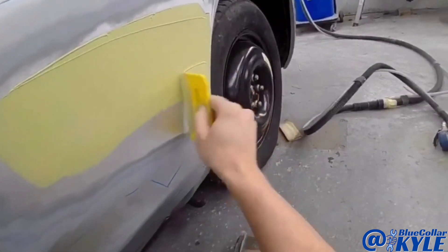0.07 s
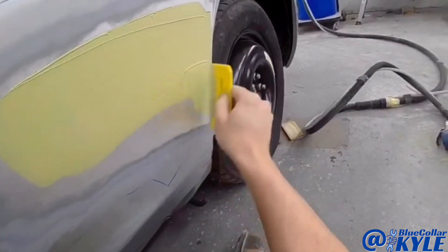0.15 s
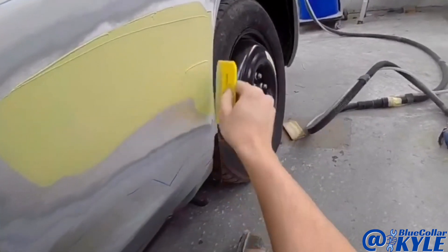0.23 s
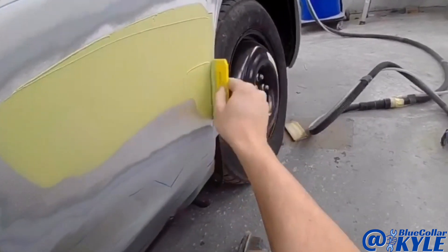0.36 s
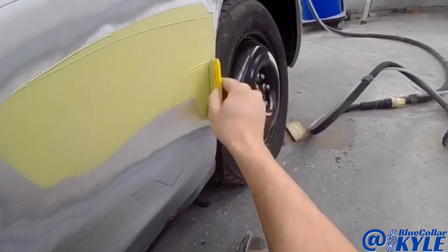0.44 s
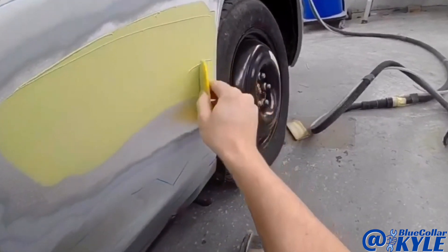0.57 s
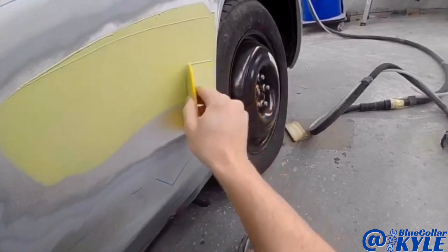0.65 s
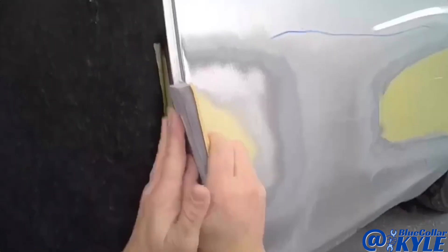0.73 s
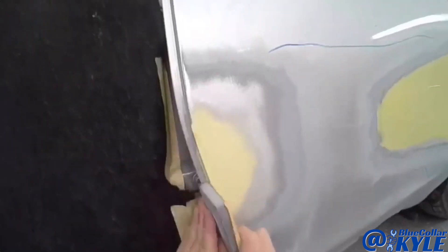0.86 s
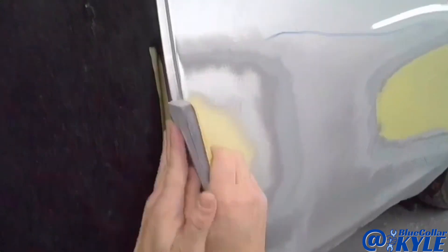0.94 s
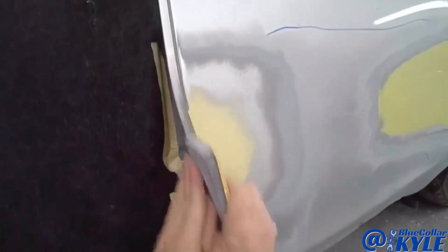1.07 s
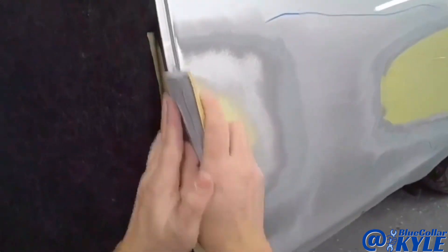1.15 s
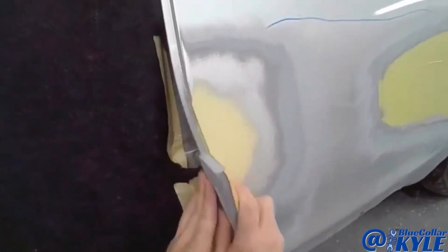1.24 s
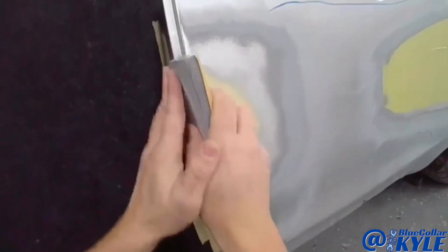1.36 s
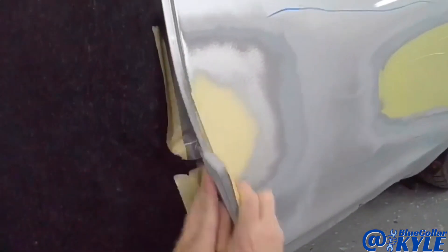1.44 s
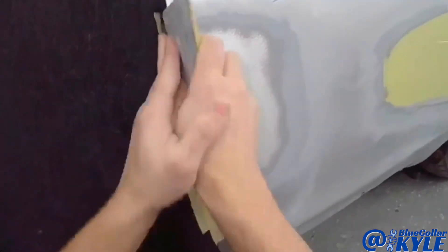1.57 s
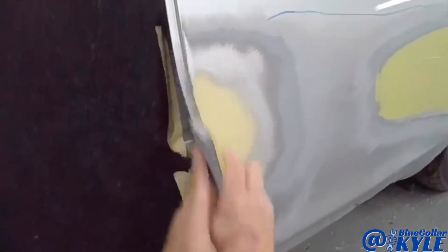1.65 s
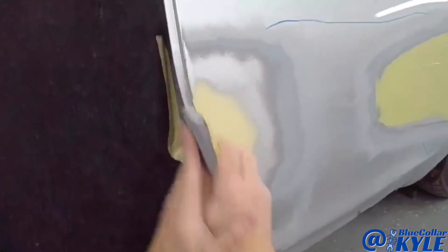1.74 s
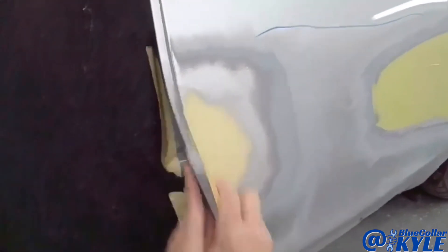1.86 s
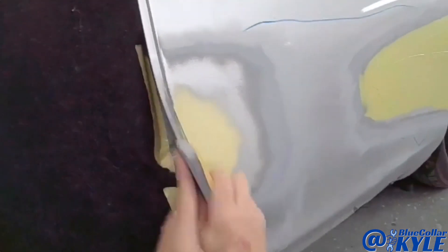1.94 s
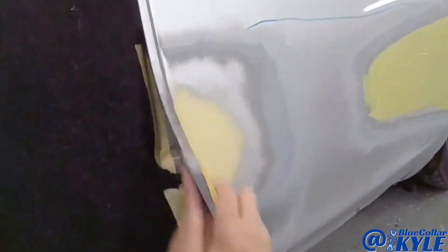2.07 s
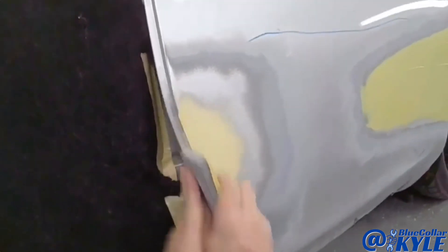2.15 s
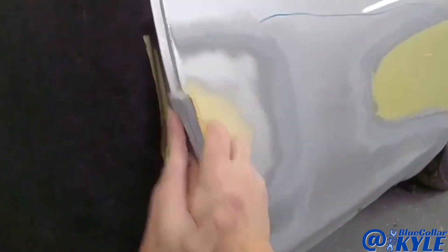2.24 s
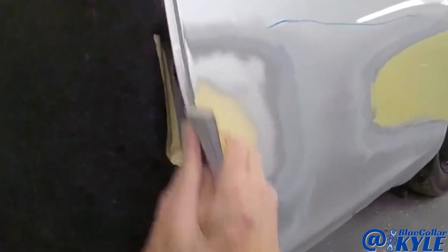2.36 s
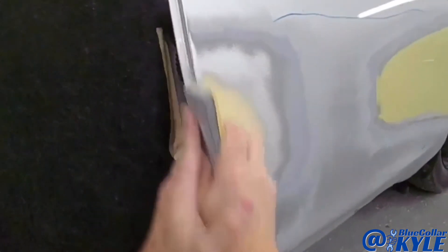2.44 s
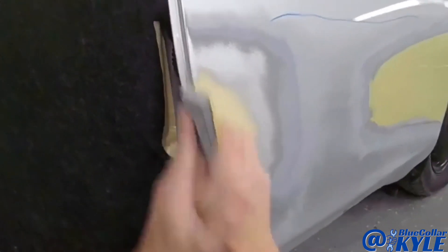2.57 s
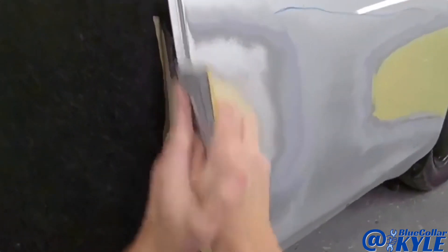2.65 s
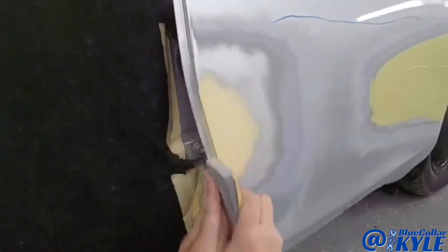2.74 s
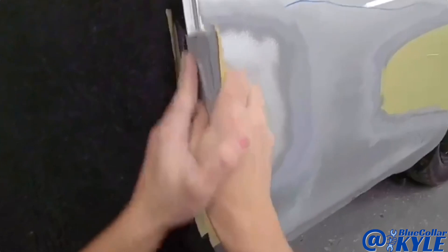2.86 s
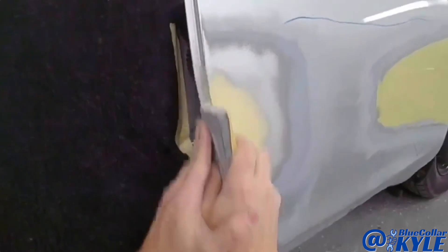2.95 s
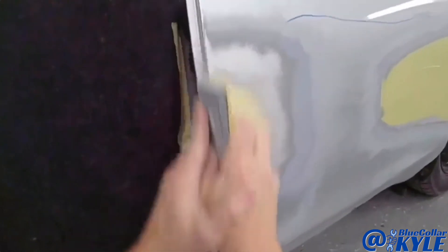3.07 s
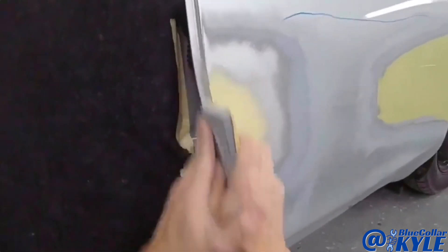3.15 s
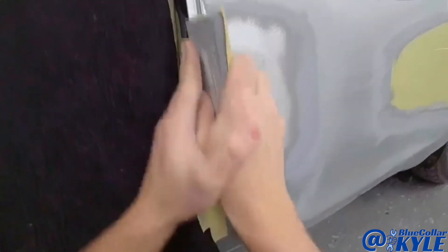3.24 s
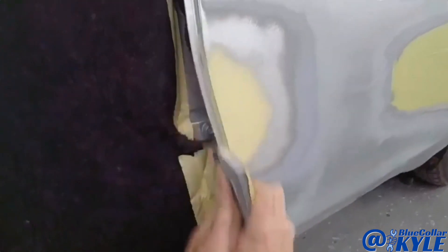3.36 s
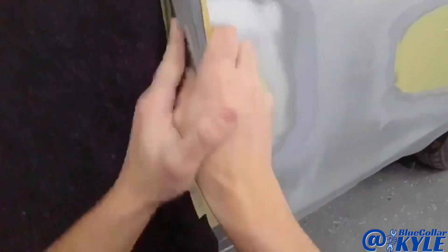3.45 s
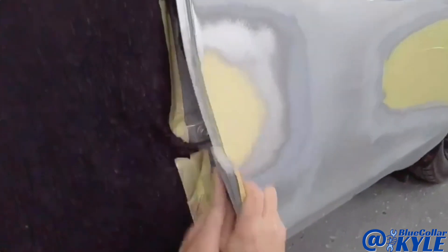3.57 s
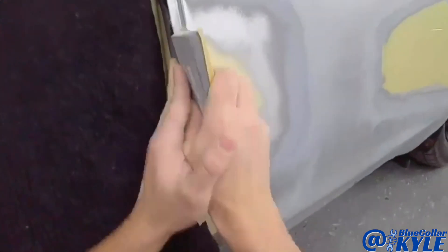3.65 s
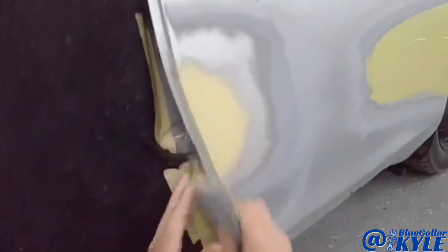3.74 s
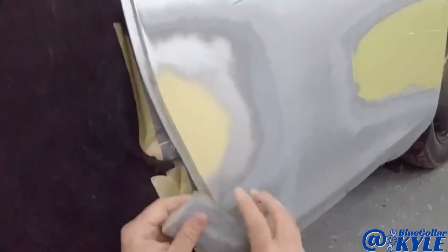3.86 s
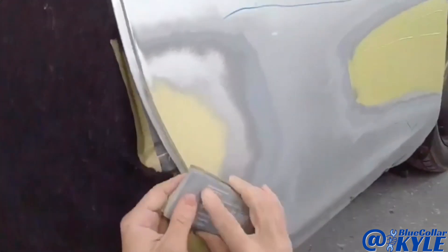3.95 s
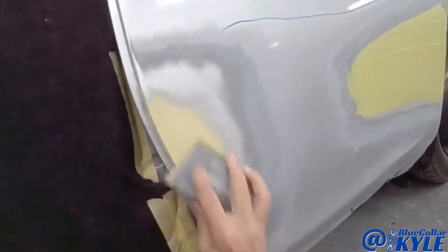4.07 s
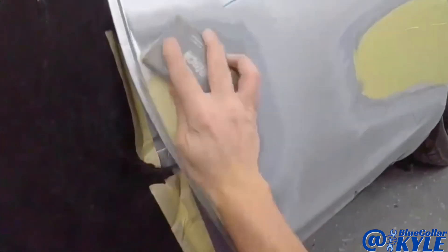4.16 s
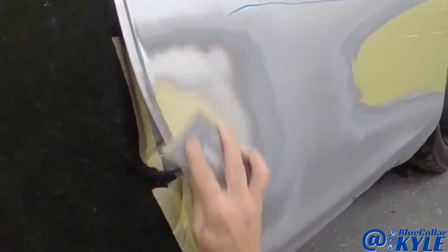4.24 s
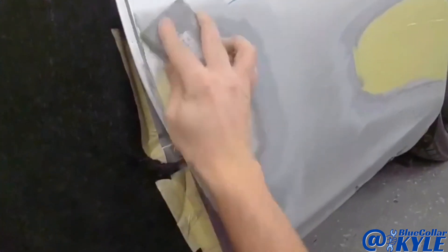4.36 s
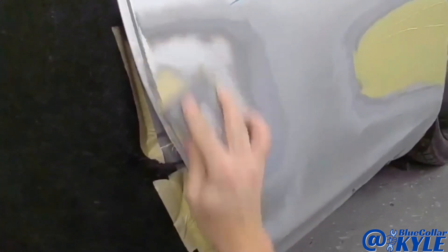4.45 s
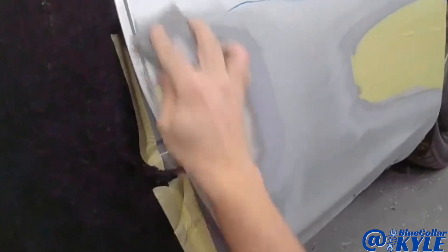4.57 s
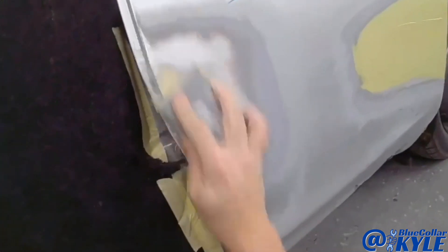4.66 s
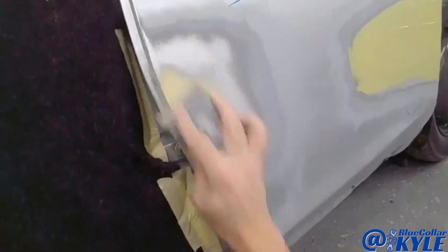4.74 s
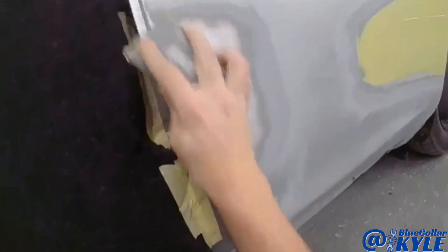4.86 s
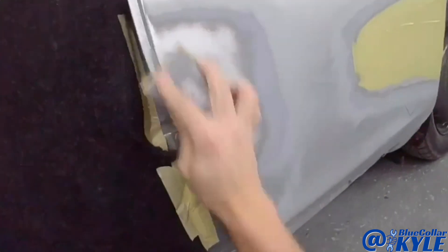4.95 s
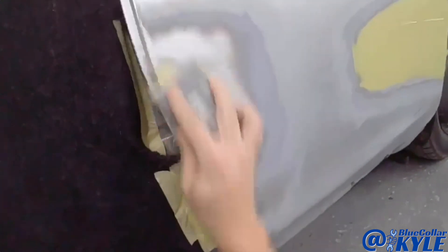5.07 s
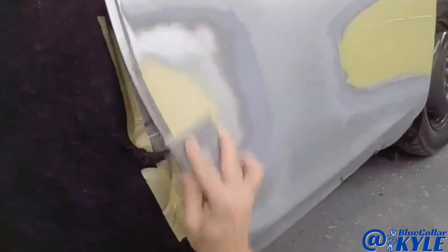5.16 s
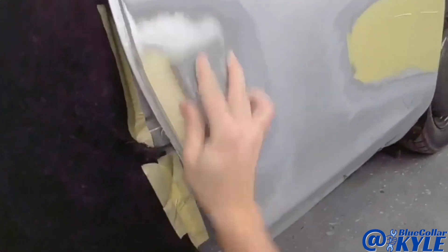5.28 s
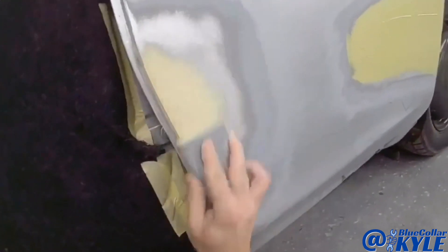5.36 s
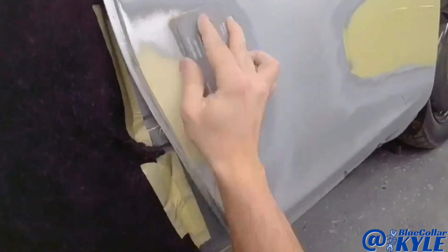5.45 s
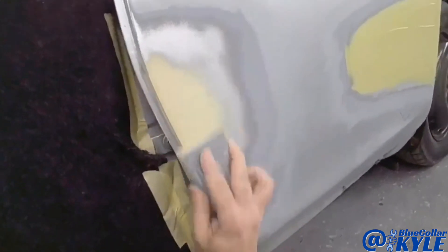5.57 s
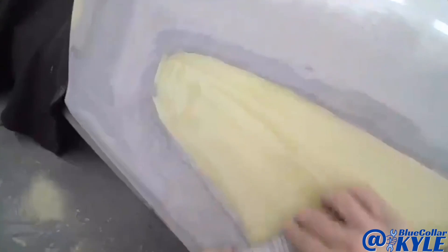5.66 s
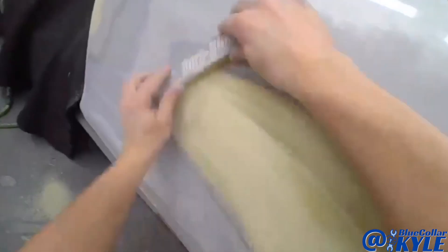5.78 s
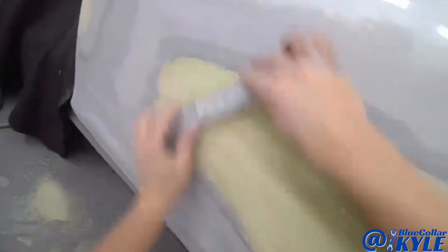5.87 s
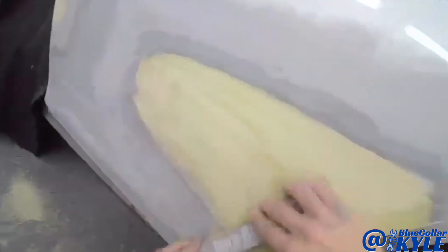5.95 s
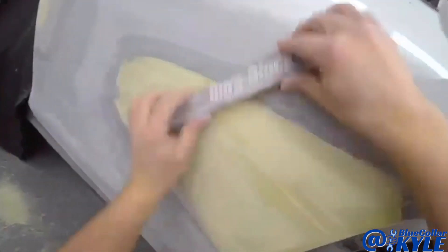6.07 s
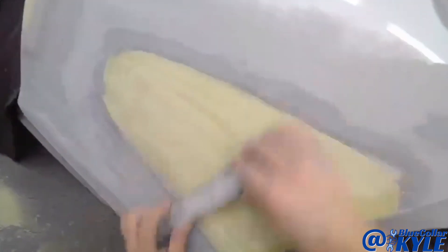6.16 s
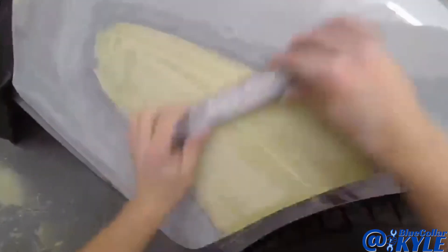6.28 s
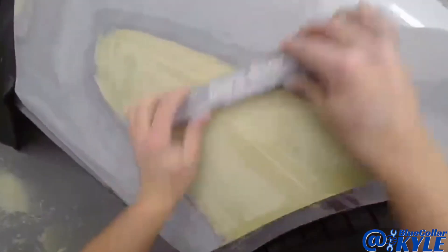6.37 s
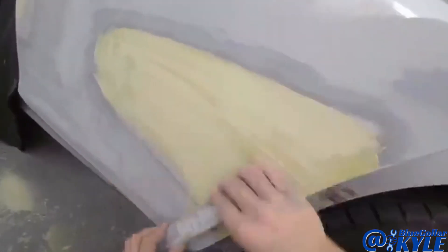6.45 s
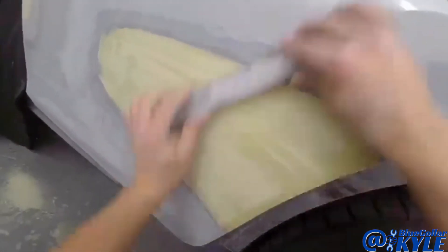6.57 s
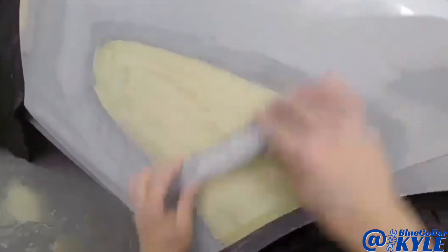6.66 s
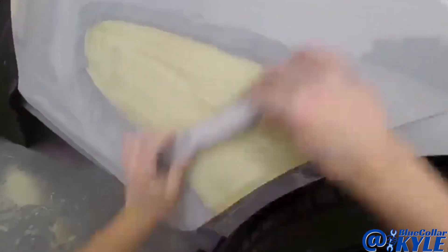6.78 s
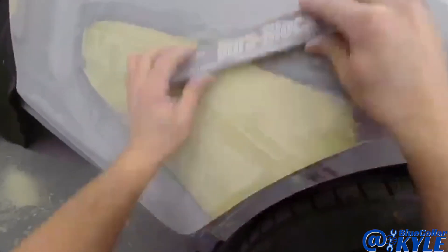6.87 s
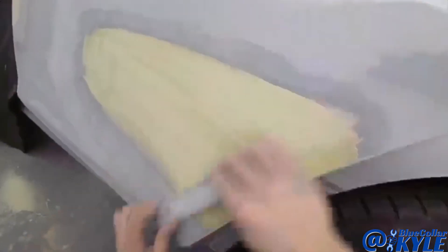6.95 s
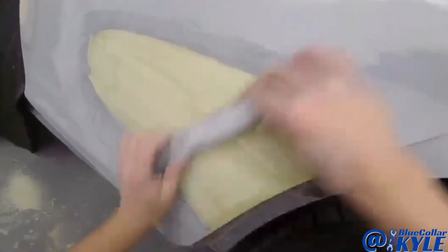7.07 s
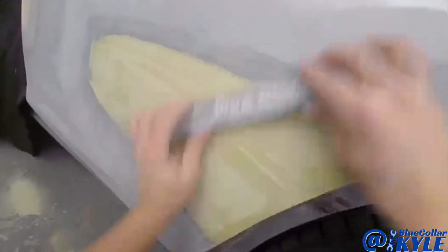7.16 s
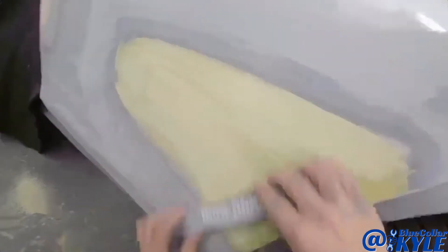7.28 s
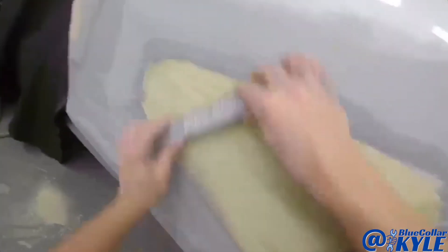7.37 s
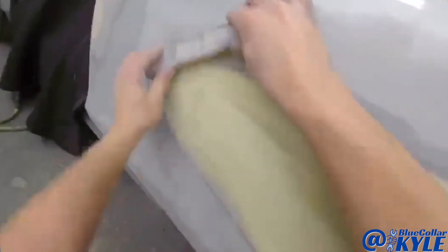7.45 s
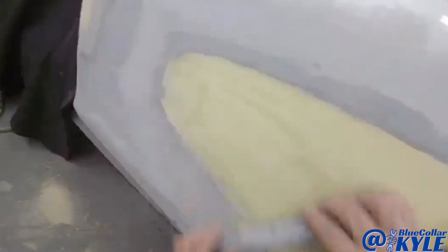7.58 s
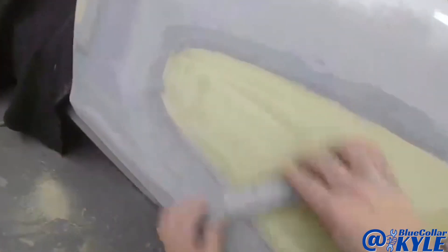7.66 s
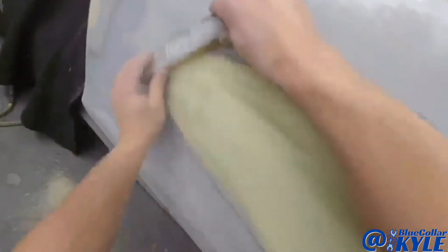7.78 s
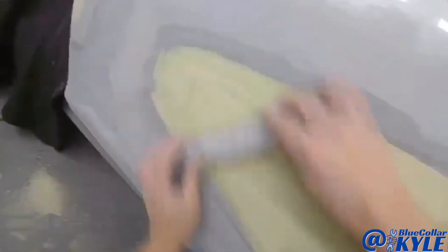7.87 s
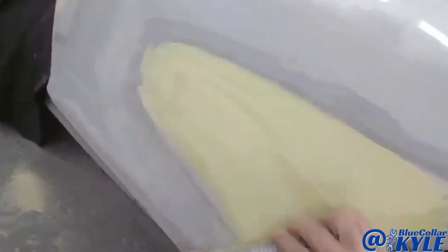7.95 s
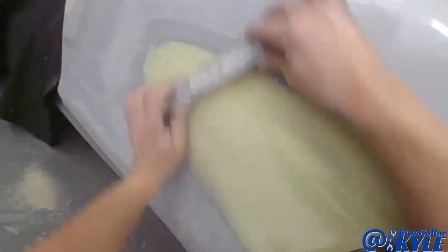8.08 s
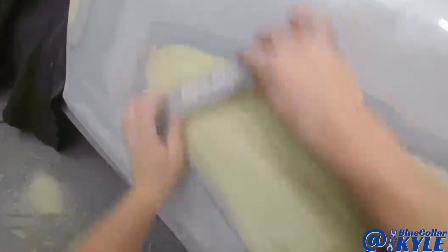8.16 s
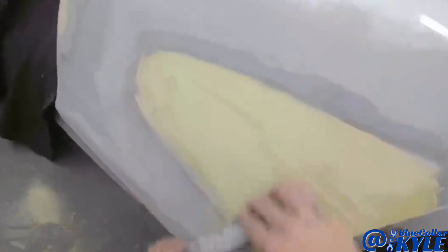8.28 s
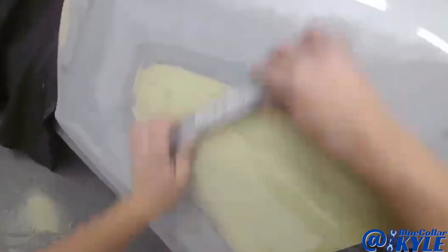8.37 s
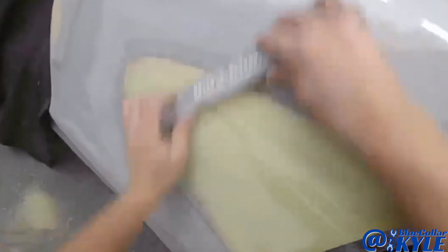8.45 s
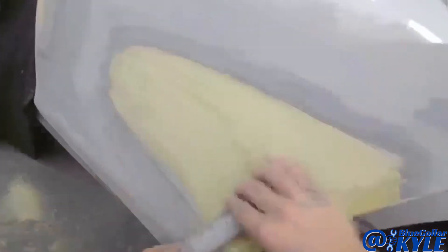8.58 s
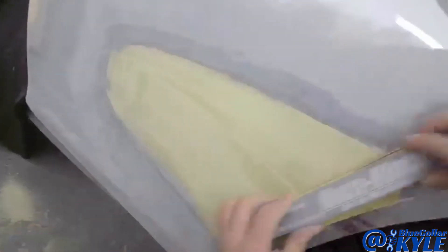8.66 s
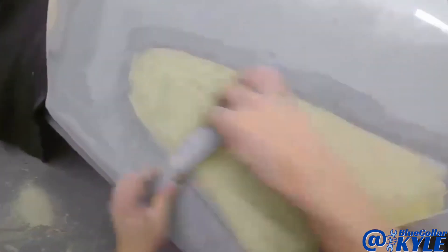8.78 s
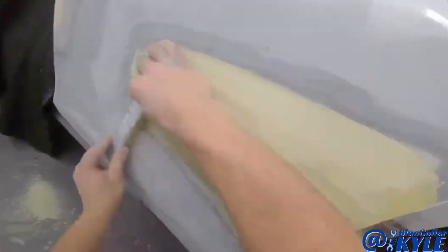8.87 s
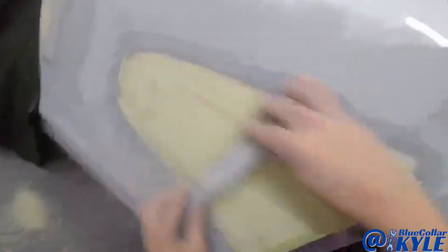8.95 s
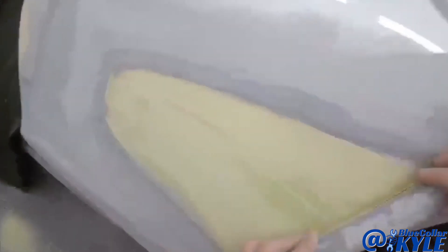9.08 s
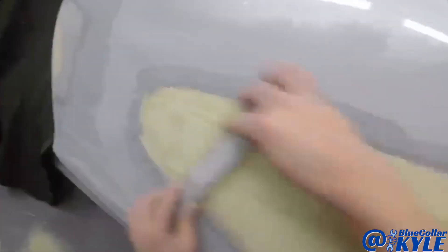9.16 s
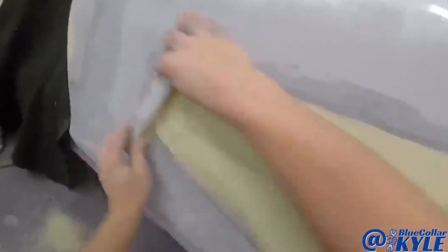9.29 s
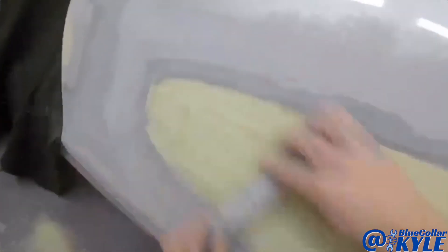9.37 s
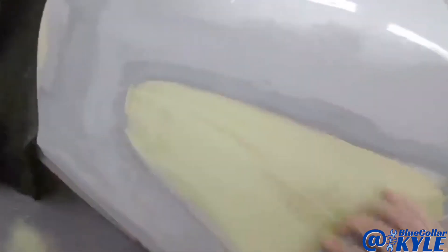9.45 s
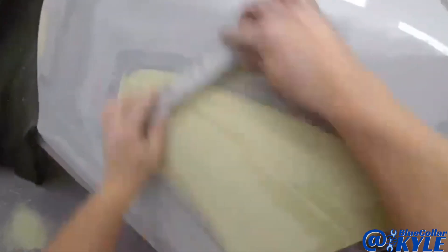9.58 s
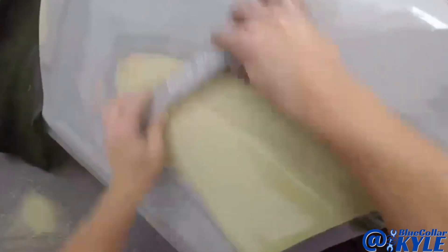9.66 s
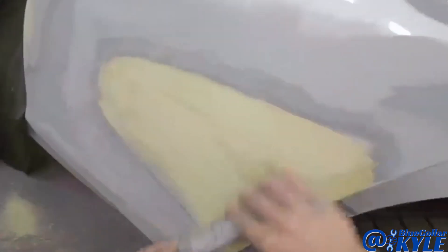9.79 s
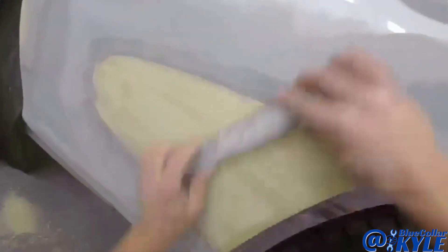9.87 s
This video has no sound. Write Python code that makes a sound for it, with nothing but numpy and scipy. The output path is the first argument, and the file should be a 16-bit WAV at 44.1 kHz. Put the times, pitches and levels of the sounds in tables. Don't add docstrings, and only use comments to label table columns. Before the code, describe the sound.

A soft, barely audible spreader swipe opens over workshop drone with compressor throb and motor whine. An abrupt cut brings rapid, hollow sandpaper rasps along a metal edge, about ten a second. After a short rustling pause, louder, brighter flat-block strokes follow, then hissy long-board strokes, slowing gradually. Close microphone, dry room with a short dull reflection.

```python
import sys
import numpy as np
from scipy import signal
from scipy.fft import rfft, irfft
from scipy.io import wavfile
from scipy.ndimage import uniform_filter1d, map_coordinates

SR = 44100
rng = np.random.default_rng(int(sys.argv[2]) if len(sys.argv) > 2 else 0)


def to_wav(sig):
    pcm = np.clip(np.atleast_2d(sig), -1, 1) * 32767
    pcm = np.round(pcm).astype(np.int16)
    wavfile.write(sys.argv[1], SR, pcm.T)


def elevation(decibels):
    levels = np.asarray(decibels, float)
    return 10 ** (levels / 20)


N = 437472
TIME_S = np.arange(N) / SR

# spreader, edge block, flat block, long board (t/s)
TOOL_START_S = [0, .727, 3.95, 5.6]
# (f/Hz, level/dB per Hz)
SPREADER_COLOUR = [(240, -46), (400, -11), (740, -6), (2140, -9), (3720, -16), (10100, -12), (15800, -13)]
EDGE_COLOUR = [(180, -32), (300, -12), (398, -18.5), (502, -7.5), (676, -1), (759, -0.5), (974, 3),
               (1150, -3), (1920, -5.5), (2680, 2.5), (3270, -12), (6890, -16.5), (8990, -8), (14100, -13),
               (15800, -19)]
FLAT_COLOUR = [(180, -30.5), (300, -19.5), (350, -28), (404, -23), (447, -24), (772, -8), (1470, -6.5),
               (1770, -4.5), (2590, 8.5), (3100, 0), (4000, 3.5), (5470, -3), (7130, -18.5), (13200, -25),
               (15800, -28)]
BOARD_COLOUR = [(180, -64), (300, -24.5), (432, -26.5), (469, -20.5), (582, -22.5), (880, -16),
                (1040, -18.5), (1800, -11.5), (3700, -4.5), (4500, 1.5), (5350, 4), (5900, -1.5),
                (6500, -11), (15000, -19.5), (15800, -16.5)]
# (t/s, pitch shift [share], hiss tilt [dB per octave])
PANEL_DRIFT = [(0.7, -.02, 7), (3.7, .02, -3), (4.1, 0.0036, -2), (5.5, -0.0077, 4), (5.7, -0.035, -10),
               (6.599, -.02, -13), (7.4, 0.0039, 1.5), (9.9, .02, 1.5)]
PANEL_DB, PANEL_T60_S = -12, 0.08


def scrape_source(tool):
    grains = grit(N)
    decay_s = np.arange(SR // 10) / SR
    modes = rng.standard_normal(len(decay_s)) * elevation(-60 * decay_s / PANEL_T60_S)
    grains = grains + elevation(PANEL_DB) * signal.fftconvolve(grains, modes / np.linalg.norm(modes))[:N]
    drift_s, shift, _ = np.transpose(PANEL_DRIFT)
    pace = 1 + 0.009 * walk(12) + np.interp(TIME_S, drift_s, shift) + dragged()
    place = np.cumsum(pace)[None] % N
    colours = (SPREADER_COLOUR, EDGE_COLOUR, FLAT_COLOUR, BOARD_COLOUR)
    return sum(map_coordinates(colour(grains, c), place, order=3) * (tool == k) for k, c in enumerate(colours))


# (judder/dB, patchiness/dB, power by which boom follows the bite, room level/dB)
TOOL_FEEL = [
    (1, -1, .7, -1),
    (1, 3, 0.43, -20.5),
    (0.6, 2.5, 0.64, -11.5),
    (0.6, 2.5, 0.68, -10.5),
]
LAYER_EDGES_HZ = [1, 1650, 3400, 6750, 30000]
RASP_FOLLOWS_SPEED = [.3, 0.33, 0.72, 0.33]


def sanding():
    tool = np.searchsorted(TOOL_START_S, TIME_S, side="right") - 1
    judder_db, patch_db, boom_power, room_db = np.array(TOOL_FEEL)[tool].T
    scrape = scrape_source(tool)
    judder = elevation(judder_db * catches(70, 0.0072))
    drift_s, _, tilt = np.transpose(PANEL_DRIFT)
    tilt_db = np.interp(TIME_S, drift_s, tilt)
    gains = hand(boom_power, np.array(RASP_FOLLOWS_SPEED)[tool])
    near = np.zeros(N)
    for gain, lo, hi in zip(gains, LAYER_EDGES_HZ, LAYER_EDGES_HZ[1:]):
        inner = np.geomspace(max(lo, 400), min(hi, 16000), num=6)[1:-1]
        edges = np.r_[lo, inner, hi]
        is_hiss = lo >= LAYER_EDGES_HZ[-2]
        layer = np.zeros(N)
        for a, b in zip(edges, edges[1:]):
            flare_db = patch_db * (0.5 * walk(25) + 0.78 * walk(70))
            if is_hiss:
                flare_db = flare_db + tilt_db * np.log2(min(a, 11200) / 9000)
            layer += band(scrape, a, b) * elevation(flare_db)
        layer *= judder
        tool_rms = np.sqrt(np.bincount(tool, layer ** 2) / np.bincount(tool))
        near += gain * layer / tool_rms[tool]
    return near + elevation(room_db) * room(near)


HAND_STOPS_S = [0.14, 3.77, 9.918]
EDGE_HEARD_S = 0.729
# (t/s, scrape level/dB, hiss level/dB)
UNUSUAL_TURNS = [(0.15, -78, -73), (1.509, -52, -60), (3.272, -117, -67), (3.386, -53, -50),
                 (3.498, -93, -99), (3.77, -54, -53), (4.082, -69, -87), (5.492, -72, -67), (5.6, -59, -50),
                 (5.666, -43, -55), (8.575, -34.5, -47), (8.703, -52, -62), (9.918, -33, -51)]


def hand(boom_power, on_speed):
    (start, bite_s, scrape_db, hiss_db, scrape_left, hiss_left, fastest, boom_db, ring_db,
     rise, fall, power, lean, swell, fade) = strokes()
    turn_s = np.sort(np.r_[start, HAND_STOPS_S])
    left_db = np.array([np.interp(turn_s, start, left) for left in (scrape_left, hiss_left)])
    for s, *odd_db in UNUSUAL_TURNS:
        left_db[:, np.argmin(abs(turn_s - s))] = odd_db
    length = turn_s[np.searchsorted(turn_s, start) + 1] - start
    early = (bite_s - start) / length
    rise = rise / (2 * early) ** power
    fall = fall / (2 - 2 * early) ** power
    bite, scrape = stroke_shape(zip(bite_s, scrape_db, rise, fall), turn_s, left_db[0])
    fastest_s = start + np.clip(fastest + lean * (early - fastest), 0.1, 0.9) * length
    speed, hiss = stroke_shape(zip(fastest_s, hiss_db, swell, fade), turn_s, left_db[1])
    stroke = np.searchsorted(start, TIME_S, side="right") - 1
    boom, ring = (uniform_filter1d(elevation(db[stroke]), size=600) for db in (boom_db, ring_db))
    rasp = scrape * bite / np.sqrt(1 + ring ** 2)
    boom_gain = uniform_filter1d(scrape, size=300) * boom * bite ** boom_power
    rasp_gain = rasp * (speed / (bite + 1e-6)) ** on_speed
    heard = (TIME_S < HAND_STOPS_S[0]) | (TIME_S >= EDGE_HEARD_S)
    return heard * np.array([boom_gain, rasp * ring, rasp_gain, hiss * speed])


# (hand sets off t/s, hardest bite t/s, scrape level/dB, hiss level/dB)
SPREADER_SWIPE = [(0.0, 0.078, -58.5, -54)]
EDGE_PASSAGE = [(0.702, 0.757, -34.5, -45), (0.8, 0.822, -35, -39), (0.898, 0.93, -34.5, -40),
                (0.995, 1.01, -38, -43), (1.09, 1.091, -34, -41.5), (1.186, 1.264, -38, -44),
                (1.287, 1.33, -36, -41.5), (1.399, 1.488, -36, -40), (1.506, 1.528, -37.5, -40),
                (1.63, 1.653, -37.5, -41), (1.743, 1.746, -34.5, -41), (1.833, 1.875, -36.5, -39.5),
                (1.947, 1.96, -33, -42), (2.054, 2.145, -36.5, -39), (2.155, 2.185, -34, -42.5),
                (2.267, 2.345, -40, -46), (2.358, 2.377, -36, -45), (2.459, 2.53, -36.5, -38),
                (2.563, 2.578, -36.5, -35.5), (2.668, 2.7, -35.5, -38.5), (2.783, 2.786, -35, -39.5),
                (2.893, 2.916, -36, -44), (2.97, 2.99, -37, -41.5), (3.065, 3.116, -37.5, -39.5),
                (3.172, 3.198, -35.5, -43), (3.273, 3.291, -37, -36), (3.391, 3.409, -36, -37),
                (3.493, 3.531, -38, -36.5), (3.61, 3.633, -38, -37.5), (3.705, 3.733, -41, -42)]
FLAT_PASSAGE = [(4.085, 4.146, -31, -32), (4.218, 4.257, -31.5, -33.5), (4.319, 4.34, -31, -33),
                (4.416, 4.481, -33.5, -33.5), (4.536, 4.558, -33.5, -31), (4.634, 4.711, -34.5, -34),
                (4.745, 4.773, -34, -33.5), (4.854, 4.929, -36, -37.5), (4.956, 4.969, -34, -35),
                (5.05, 5.11, -34.5, -32), (5.178, 5.202, -33, -33.5), (5.277, 5.329, -35, -35),
                (5.386, 5.418, -34, -31.5), (5.492, 5.544, -34.5, -34)]
QUICK_PASSAGE = [(5.606, 5.639, -32, -30.5), (5.664, 5.748, -32, -32), (5.83, 5.927, -31, -32.5),
                 (5.976, 6.037, -32, -34.5), (6.1, 6.163, -29.5, -32), (6.234, 6.297, -31, -36.5),
                 (6.358, 6.389, -29.5, -34), (6.491, 6.579, -32.5, -37), (6.62, 6.668, -29.5, -34),
                 (6.756, 6.826, -34, -37), (6.885, 6.937, -30, -32.5), (7.017, 7.105, -33, -37.5),
                 (7.149, 7.18, -30.5, -32.5)]
LONG_PASSAGE = [(7.278, 7.342, -29.5, -31.5), (7.462, 7.56, -30, -32.5), (7.625, 7.718, -31, -30),
                (7.798, 7.862, -30, -30), (7.964, 8.021, -30.5, -30.5), (8.133, 8.222, -29.5, -31),
                (8.29, 8.346, -30, -33.5), (8.441, 8.523, -29.5, -30), (8.575, 8.62, -34.5, -40),
                (8.694, 8.741, -30.5, -28.5), (8.894, 9.017, -29.5, -30.5), (9.073, 9.12, -31, -29),
                (9.283, 9.385, -30, -30.5), (9.46, 9.509, -31, -30.5), (9.627, 9.737, -30, -32),
                (9.795, 9.85, -30.5, -34)]
# (scrape level/dB before push, before pull, hiss level/dB before push, before pull)
TURN_LEVELS = [(-80, -75, -79, -77), (-54.5, -90, -63, -74.5), (-46, -54, -50.5, -53.5),
               (-64, -60, -54, -52), (-54.5, -59.5, -55, -55.5)]
BITE_SHAPE = [(1.5, 3.2, .1), (1.4, 1.3, 0.76), (1.4, 1.5, 0.17), (0.72, 0.99, 0.22), (1.54, 1.3, 0.7)]
SPEED_SHAPE = [(0.54, .51, 0.03, 3.5, 3.9), (0.34, 0.65, 0.14, 2.4, 2.3), (0.41, 0.59, 0.34, 1.5, 1.83),
               (0.53, 0.54, 0, 1.34, 1.6), (0.55, 0.47, 0, 2.55, 1.36)]
# (first stroke level/dB, last stroke level/dB, effort slope [dB/dB], extra on pull/dB)
PANEL_BOOM = [(-6, 6, 0, 0), (0.5, -5, -0.28, -1.5), (-6, -8, -.5, -0.5), (-15.5, -16.5, -0.5, 1.5),
              (-18, -19.5, 1.9, 1.5)]
BLOCK_RING = [(9, 10, 0, 0), (11.5, 5.5, -0.78, -0.36), (3.5, 2, -1.55, 0.65), (-5.5, -3, 0.32, -0.37),
              (-5.5, -6.5, 0.25, 1)]


def strokes():
    passages = (SPREADER_SWIPE, EDGE_PASSAGE, FLAT_PASSAGE, QUICK_PASSAGE, LONG_PASSAGE)
    out = []
    for k, rows in enumerate(passages):
        start, bite, scrape_db, hiss_db = np.transpose(rows)
        pull = np.arange(len(rows)) % 2
        along = np.linspace(0, 1, len(rows))
        effort_db = scrape_db - np.median(scrape_db)

        def pick(on_push, on_pull):
            return np.where(pull, on_pull, on_push)

        def tone(first, last, slope, extra):
            return first + (last - first) * along + slope * effort_db + extra * pull

        habits = [np.full(len(rows), v) for v in (*BITE_SHAPE[k], *SPEED_SHAPE[k][2:])]
        out.append([start, bite, scrape_db, hiss_db, pick(*TURN_LEVELS[k][:2]), pick(*TURN_LEVELS[k][2:]),
                    pick(*SPEED_SHAPE[k][:2]), tone(*PANEL_BOOM[k]), tone(*BLOCK_RING[k]), *habits])
    return np.hstack(out)


def stroke_shape(rows, turn_s, left_db):
    share, top = np.zeros(N), np.zeros(N)
    for s, db, rise, fall in rows:
        k = np.searchsorted(turn_s, s)
        span = slice(int(turn_s[k - 1] * SR), int(turn_s[k] * SR))
        t = TIME_S[span]
        going = t < s
        swing = np.sin(np.interp(t, [turn_s[k - 1], s, turn_s[k]], [0, np.pi / 2, 0]))
        rest = np.minimum(elevation(np.where(going, left_db[k - 1], left_db[k]) - db), 1)
        share[span] = rest + (1 - rest) * np.maximum(swing, 0) ** np.where(going, rise, fall)
        top[span] = elevation(db)
    return share, top


def grit(length):
    size_steps = np.minimum(rng.exponential(size=length), 4)
    return rng.standard_normal(length) * elevation(1.3 * size_steps)


def catches(rate_hz, hold_s):
    hits = rng.exponential(size=N) * (rng.random(N) < rate_hz / SR)
    held = signal.lfilter([1], [1, -np.exp(-1 / (hold_s * SR))], hits)
    held = uniform_filter1d(held, size=90)
    swing = unit(held - uniform_filter1d(held, size=3000))
    return unit(np.tanh(0.6 * swing))


# (t/s, peak level/dB, f/Hz, lets go in t/s)
EDGE_CLUMPS = [(0.7323, -22, 2350, 0.018), (0.8156, -31, 2143, 0.018), (0.906, -20, 2463, 0.018),
               (1.009, -23, 2540, 0.018), (1.0462, -25, 2660, 0.018), (1.092, -24, 2403, 0.015),
               (1.2002, -27, 2480, 0.018), (1.2387, -21, 2600, 0.015), (1.2965, -23, 2556, 0.023),
               (1.315, -21, 2720, 0.021), (1.4143, -27, 2123, 0.018), (1.527, -30, 2768, 0.016),
               (1.6573, -16.5, 2240, 0.015), (1.7496, -38, 2690, 0.019), (1.8631, -21, 2000, 0.018),
               (1.959, -71, 2707, 0.018), (2.0666, -20.5, 2190, 0.017), (2.1185, -24, 2750, 0.014),
               (2.172, -23, 2666, 0.019), (2.2823, -34, 2585, 0.016), (2.3723, -21, 2514, 0.017),
               (2.4718, -28, 2364, 0.018), (2.4884, -28, 2624, 0.018), (2.5772, -17, 2806, 0.02),
               (2.6346, -17, 2453, 0.01), (2.6899, -21, 2378, 0.016), (2.7846, -28, 2806, 0.021),
               (2.9014, -27, 2746, 0.016), (2.9333, -24, 2747, 0.021), (2.9852, -23, 2398, 0.018),
               (3.0871, -22, 2028, 0.019), (3.1408, -19, 2646, 0.016), (3.1817, -24, 2645, 0.018),
               (3.291, -16.5, 2688, 0.019), (3.3999, -22, 2780, 0.022), (3.516, -39, 2730, 0.018),
               (3.526, -28, 2780, 0.018), (3.5758, -30, 2850, 0.015), (3.627, -26, 2652, 0.016),
               (3.724, -30, 2673, 0.018)]
FLAT_CLUMPS = [(4.0952, -17, 2240, 0.018), (4.2304, -17, 4400, 0.015), (4.336, -20, 2686, 0.014),
               (4.424, -32, 2583, 0.018), (4.5416, -41, 2330, 0.016), (4.65, -37, 2570, 0.021),
               (4.7572, -14, 2600, 0.019), (4.867, -26, 2655, 0.018), (4.9672, -13, 2400, 0.019),
               (5.078, -16, 2510, 0.019), (5.1835, -19, 2646, 0.016), (5.2945, -24, 2576, 0.018),
               (5.4158, -20, 5380, 0.019), (5.5064, -36, 2980, 0.019), (5.5255, -15, 5140, 0.018),
               (5.6091, -29, 4846, 0.015), (5.6324, -17, 5330, 0.018)]
BOARD_CLUMPS = [(5.6795, -30, 5190, 0.021), (5.8446, -19, 5110, 0.021), (5.9846, -22, 5365, 0.023),
                (6.1093, -19, 4970, 0.022), (6.2405, -22, 4630, 0.018), (6.3711, -28, 4795, 0.019),
                (6.5007, -19, 5330, 0.023), (6.5232, -17, 4970, 0.022), (6.6343, -18, 5200, 0.023),
                (6.7678, -24, 5550, 0.025), (6.904, -27, 5360, 0.018), (7.032, -22, 5760, 0.021),
                (7.0683, -17, 5150, 0.021), (7.1698, -12, 5350, 0.026), (7.2978, -19, 5480, 0.022),
                (7.3136, -28, 5070, 0.022), (7.4964, -28.5, 5460, 0.021), (7.644, -23, 5210, 0.022),
                (7.6878, -26, 5200, 0.021), (7.8277, -29, 5220, 0.022), (7.9935, -22, 5620, 0.021),
                (8.1444, -32, 5450, 0.018), (8.1845, -24, 4760, 0.019), (8.311, -36, 5350, 0.02),
                (8.4525, -15, 5270, 0.025), (8.718, -19, 4550, 0.023), (8.7382, -10, 5243, 0.021),
                (8.906, -21.5, 5210, 0.021), (8.932, -18, 5340, 0.022), (9.1085, -11, 5210, 0.023),
                (9.3021, -18, 5150, 0.026), (9.4827, -25, 4560, 0.019), (9.6832, -32, 4960, 0.023),
                (9.8083, -19, 5145, 0.022), (9.8269, -19, 5530, 0.02)]
GRAB_RMS_DB, GRAB_WIDTH, GRAB_RISE_S = [-13, -17, -17], [0.057, 0.081, 0.072], 0.0018


def grabs():
    out, t = np.zeros(N + SR), np.arange(SR // 5) / SR
    grains = grit(N + SR)
    for rows, rms_db, width in zip((EDGE_CLUMPS, FLAT_CLUMPS, BOARD_CLUMPS), GRAB_RMS_DB, GRAB_WIDTH):
        for s, db, hz, hold_s in rows:
            span = slice(int(s * SR), int(s * SR) + len(t))
            spot = signal.butter(1, [hz / (1 + width), hz * (1 + width)], "bandpass", fs=SR)
            ring = unit(signal.lfilter(*spot, grains[span]))
            envelope = np.minimum(t / GRAB_RISE_S, 1) * np.exp(-(t / max(hold_s, 0.003)) ** 0.89)
            out[span] += elevation(db + rms_db) * ring * envelope
    return out[:N]


TOOL_RING_HZ, GRAB_PULL = [2600, 2600, 5136], [0.45, 0.1503, 0.2]


def dragged():
    grab_s, share = [], []
    for rows, ring_hz, pull in zip((EDGE_CLUMPS, FLAT_CLUMPS, BOARD_CLUMPS), TOOL_RING_HZ, GRAB_PULL):
        for s, _, hz, _ in rows:
            grab_s.append(s)
            share.append(pull * np.clip(hz / ring_hz - 1, -0.2, 0.12))
    latest = np.maximum(np.searchsorted(grab_s, TIME_S) - 1, 0)
    return uniform_filter1d(np.array(share)[latest], size=500)


def room(near):
    t = np.arange(SR // 2) / SR
    tail = rng.standard_normal(len(t)) * elevation(-60 * t / 0.13)
    delay = 0.002 * SR * (1 + 0.4 * walk(6))
    moving = np.interp(np.arange(N) - delay, np.arange(N), near)
    return signal.fftconvolve(band(moving, 1, 6100), tail / np.linalg.norm(tail))[:N]


# (t/s, peak level/dB, f/Hz,
# length t/s)
PAPER_RUSTLES = [(1.656, -18, 3500, 0.0076), (3.73, -20, 4740, 0.0056), (3.766, -32, 2600, 0.015),
                 (3.758, -26, 8500, 0.0088), (3.829, -38, 3110, 0.0064), (3.857, -31, 3180, 0.0059),
                 (3.938, -39, 8700, 0.0032), (4.051, -30, 9000, 0.0024)]


def rustles():
    out, t = np.zeros(N), np.arange(SR // 5) / SR
    for s, db, hz, length in PAPER_RUSTLES:
        sos = signal.butter(2, [hz * 0.73, hz * 1.5], "bandpass", fs=SR, output="sos")
        hiss = unit(signal.sosfilt(sos, rng.standard_normal(len(t))))
        puff = hiss * t / length * np.exp(1 - t / length)
        out[int(s * SR):int(s * SR) + len(t)] += elevation(db - 25.5) * puff
    return out


# (t/s, peak level/dB, f/Hz, t60 t/s)
PANEL_BUMPS = [(3.73, -36.5, 542, 0.097), (4.063, -42, 624.5, 0.11), (4.097, -31, 749, 0.063),
               (6.4, -45, 235.6, 0.084), (6.492, -41, 216.2, 0.084), (6.764, -36.5, 389.5, 0.073),
               (7.802, -49, 240, 0.14), (8.897, -47.5, 252, 0.18), (8.925, -51, 189, 0.15)]


def bumps():
    out, t = np.zeros(N), np.arange(SR // 5) / SR
    for s, db, hz, t60 in PANEL_BUMPS:
        modes = sum(a * np.sin(2 * np.pi * r * hz * t) for r, a in ((1, 1), (2.3, 0.39), (0.453, 0.22)))
        around = signal.butter(2, [hz * 0.7, hz * 1.5], "bandpass", fs=SR)
        thud = unit(signal.lfilter(*around, rng.standard_normal(len(t))))
        envelope = elevation(db + 6.0 - 60 * t / t60) * np.minimum(t / 0.0061, 1)
        out[int(s * SR):int(s * SR) + len(t)] += envelope * (0.45 * modes + 0.5 * thud)
    return out


SCENE_START_S = [0, .727, 3.95, 5.666]
# (f/Hz, level/dB per Hz)
BAY_AIR = [(15, -30), (43, -13), (125, -2), (250, -7), (400, -9), (590, -17), (750, -1), (1050, -7.5),
           (1500, -14.5), (2500, -17), (3000, -23.5), (6500, -41.5), (7800, -40.5), (12000, -44),
           (15000, -58)]
DOOR_AIR = [(15, -34), (43, -10), (125, 0), (250, -8), (400, -11), (550, -12.5), (790, -6), (1000, -11.5),
            (1500, -17), (2500, -22), (3200, -26), (6000, -38), (11000, -40), (15000, -43)]
BENCH_AIR = [(15, -51), (45, -39), (80, -6), (120, 6), (250, 4.5), (430, 2.5), (1000, -5.5), (2500, 10),
             (6000, -34)]
# (t/s, level/dB)
AIR_LEVELS = [
    [(0, -58), (.727, -56.5)],
    [(.727, -49.5), (1.6, -54.5), (4.0, -54), (4.3, -58), (5.666, -58)],
    [(5.666, -57.5), (6.9, -60), (7.3, -62), (9.92, -64.5)],
]
# (f/Hz, level/dB)
FAN_WHINES = [(495.3, -67.5), (538.3, -70.5), (667.5, -66), (775.2, -63.5), (866.7, -69), (958.2, -63),
              (1023, -65), (1147, -71), (1308, -71), (1362, -67), (1846, -71), (2509, -71)]
# (f/Hz, level/dB)
MOTOR_HUM = [(247.6, -68.5), (328.4, -73), (430.7, -72.5)]
PUMP_DB = [-1, -6, -22]


def workshop():
    out = np.zeros(N)
    swell_db = 0.8 * walk(7)
    thump, valves = compressor()
    for place, curve, pump_db in zip((BAY_AIR, DOOR_AIR, BENCH_AIR), AIR_LEVELS, PUMP_DB):
        s, db = np.transpose(curve)
        air = colour(rng.standard_normal(N), place)
        air = air / np.std(band(air, 60, 350))
        puffs = band(air, 840, 2300) * (valves - 1) * 0.25
        air += elevation(pump_db) * (thump + puffs)
        here = (TIME_S >= s[0]) * (TIME_S < s[-1])
        out += air * elevation(np.interp(TIME_S, s, db) + swell_db) * here
    fan = whines(FAN_WHINES, 0.003) * (TIME_S < SCENE_START_S[1])
    hum = whines(MOTOR_HUM, 0.00987) * (TIME_S >= SCENE_START_S[3])
    return out + fan + hum


def compressor():
    stroke_hz = 20.62
    t = TIME_S - 0.002
    since = t % (1 / stroke_hz)
    chamber = np.sin(2 * np.pi * 124 * since) + 0.44 * np.sin(2 * np.pi * 230 * since)
    thump = np.exp(-since / 0.012) * chamber * elevation(2.1 * walk(22))
    valves = np.exp(-(t * 1.5 * stroke_hz % 1) / 0.35)
    return unit(thump), valves / valves.mean()


def whines(lines, waver):
    out = np.zeros(N)
    for hz, db in lines:
        phase = 2 * np.pi * np.cumsum(hz * (1 + waver * walk(25))) / SR
        out += elevation(db + 1 + 3 * walk(14)) * np.sin(phase)
    return out


def unit(x):
    return x / np.sqrt(np.mean(x ** 2))


def colour(x, spectrum):
    hz, db = np.transpose(spectrum)
    size = 4096
    grid = np.maximum(np.fft.rfftfreq(size, 1 / SR), 1)
    cepstrum = irfft(np.interp(np.log(grid), np.log(hz), db) * np.log(10) / 20)
    cepstrum[1:size // 2] *= 2
    cepstrum[size // 2 + 1:] = 0
    return signal.fftconvolve(x, irfft(np.exp(rfft(cepstrum))))[:N]


def band(x, lo_hz, hi_hz):
    hz = np.fft.rfftfreq(N, 1 / SR) + 1
    share = 1 / (1 + (hz / hi_hz) ** 10) - 1 / (1 + (hz / lo_hz) ** 10)
    return irfft(rfft(x) * share, N)


def walk(rate_hz):
    k = max(int(SR / rate_hz), 2)
    held = np.repeat(rng.standard_normal(N // 100), k)[:N]
    return unit(uniform_filter1d(uniform_filter1d(held, k), k))


def scene():
    mix = sanding() + grabs() + rustles() + bumps() + workshop()
    return np.tile(mix, (2, 1))


def band_limit(x):
    return signal.sosfilt(signal.butter(12, 15830, fs=SR, output="sos"), x)


def record(dry):
    top_cut = signal.ellip(10, 0.2, 80, 15900, fs=SR, output="sos")
    return band_limit(signal.sosfilt(top_cut, dry))


dry = scene()
out = record(dry)
to_wav(out)
```